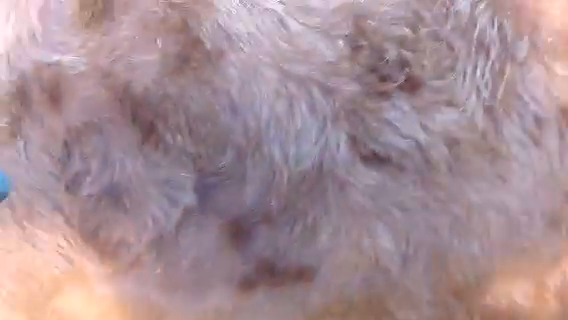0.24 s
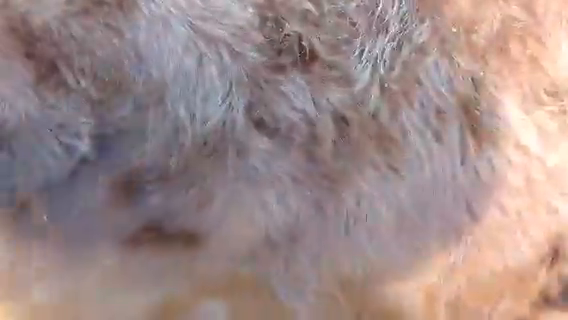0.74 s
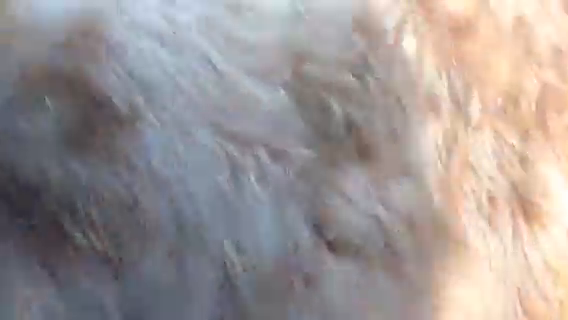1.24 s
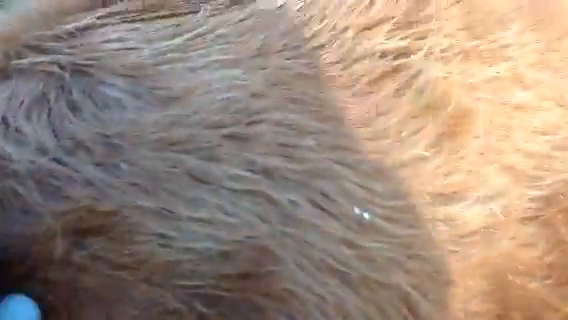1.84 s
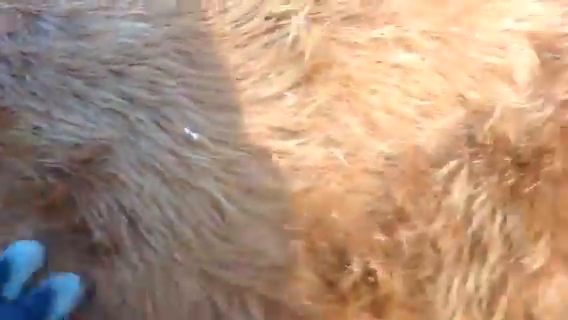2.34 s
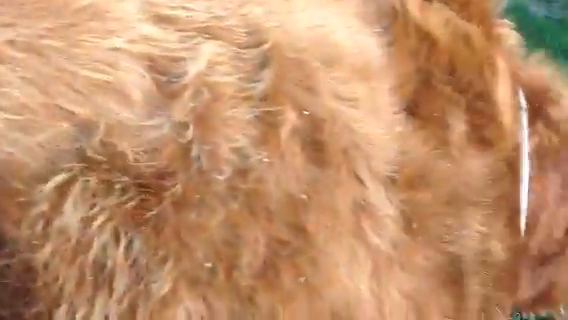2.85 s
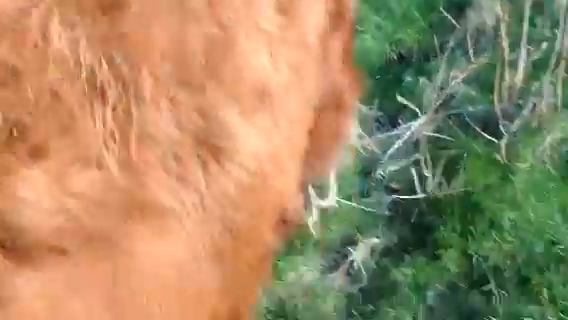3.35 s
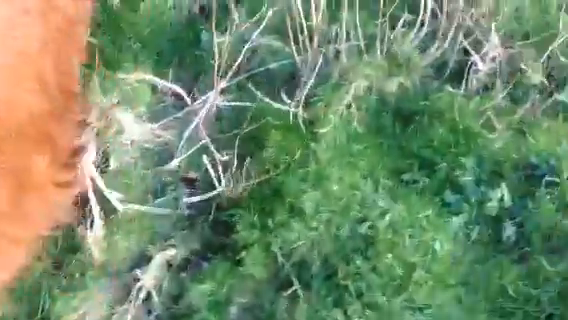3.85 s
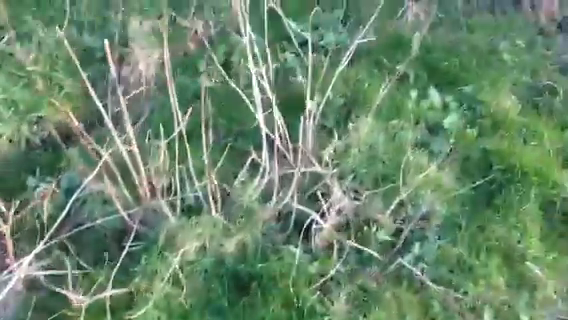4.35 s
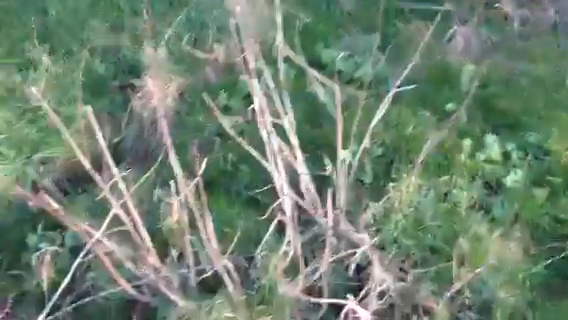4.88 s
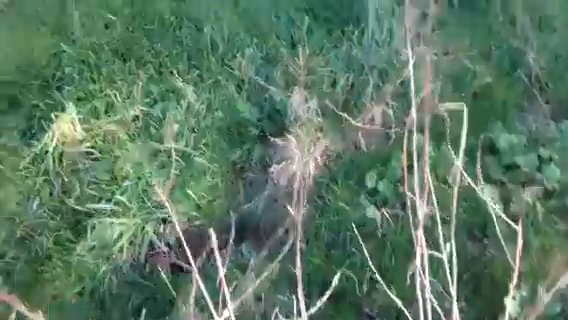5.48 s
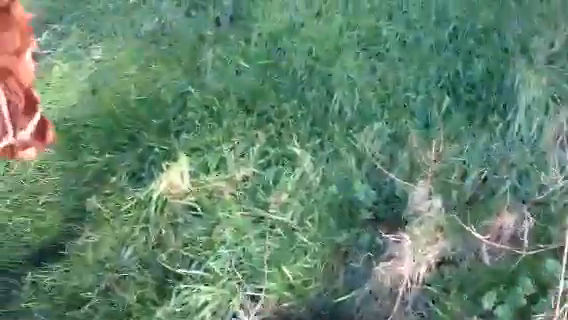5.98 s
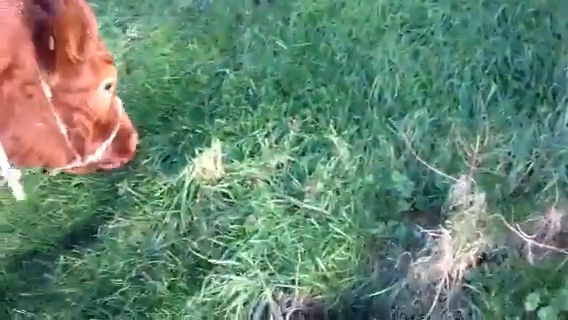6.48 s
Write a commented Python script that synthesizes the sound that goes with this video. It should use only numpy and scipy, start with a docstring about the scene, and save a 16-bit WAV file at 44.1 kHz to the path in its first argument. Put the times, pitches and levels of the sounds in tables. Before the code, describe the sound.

Close, dry outdoor sound of a cow grazing. Grass rustles softly over a faint low rumble while a gloved hand lightly rubs the coat. Two sharp snaps break tufts about a second apart. Brighter swishes and crisp ticks thicken, then a mouthful tears off in one loud, dense rip with a low thump. Weaker rustles and dull little thuds follow and thin out. Small microphone, no echo.

```python
"""A field: a cow grazes close by. Blades swish and tick as she moves through the grass. Two sharp knocks sound
near 0.75 s and 1.77 s (damped swings and bursts of noise); a mouthful comes away in one loud rip of dense,
merging fractures. A gloved hand rubs her coat (swelling resonant noise) and a few dull thuds sound (low
swings). Filtered noise makes the low rumble of open country."""
import sys
import numpy as np
from scipy import signal
from scipy.fft import rfft, irfft, next_fast_len
from scipy.io import wavfile
from scipy.ndimage import uniform_filter1d

SR = 44100
rng = np.random.default_rng(int(sys.argv[2]) if len(sys.argv) > 2 else 0)


def generate_wav(signal):
    """Clip the signal to [-1, 1] and save it as 16-bit WAV at the path in sys.argv[1]."""
    frames = np.transpose(np.atleast_2d(signal))
    scaled = np.clip(frames, -1, 1) * 32767
    pcm = np.round(scaled).astype(np.int16)
    wavfile.write(sys.argv[1], SR, pcm)


N = 296352
TIME = np.arange(N) / SR

# sharp knocks, each a few quick hits: (time [s], body level [dB], body pitch [Hz], body t60 [s], crack level
# relative to body, before the common trim [dB], crack t60 [s])
KNOCKS = [(.7400, -32, 400, 0.024, -4, 0.026), (.7500, -17.5, 400, 0.008, -10, 0.0052),
          (.7540, -10.5, 463, 0.0097, -14.5, .014), (.7555, -21.5, 824, 0.044, -7.5, 0.013),
          (0.7605, -24.5, 318, 0.044, -5, 0.025), (1.7646, -11.5, 1140, 0.004, -7, .011),
          (1.77, -21.5, 230, 0.025, 4.5, 0.016), (1.7721, -15.5, 1390, .0066, -1.5, 0.014),
          (1.7738, -6, 2130, 0.0009, -2.5, 0.0023)]


def undb(db):
    """Decibels to gain."""
    return 10 ** (np.asarray(db) / 20)


def unit(x):
    """Scale to rms 1."""
    return x / np.sqrt(np.mean(x ** 2))


def add(track, s, sound):
    """Mix a sound into a track at time s."""
    i = int(s * SR)
    track[i:i + len(sound)] += sound[:N - i]


def colour(x, points):
    """Minimum-phase filter through (frequency [Hz], level [dB]) points; keeps the power of white noise."""
    size = next_fast_len(len(x) + 4096, True) * 2
    hz, db = np.transpose(points)
    bins_hz = np.fft.rfftfreq(size, 1 / SR)
    gain = unit(undb(np.interp(np.log(bins_hz + 1), np.log(hz), db)))
    # folding the cepstrum makes the response causal
    cepstrum = irfft(np.log(gain))
    cepstrum[1:size // 2] *= 2
    cepstrum[size // 2 + 1:] = 0
    response = np.exp(rfft(cepstrum))
    return irfft(rfft(x, size) * response)[:len(x)]


def resonate(x, hz, width_hz):
    """One band-pass resonance."""
    q = hz / min(width_hz, SR / 3)
    b, a = signal.iirpeak(min(hz, SR / 2 - 1), q, fs=SR)
    return signal.lfilter(b, a, x)


def fade(t60_s):
    """Exponential decay, cut off after a fifth of a second."""
    return np.exp(-np.log(1000) * TIME[:SR // 5] / t60_s)


def recoil(hz, t60_s):
    """Damped swing of something suddenly let go."""
    decay = fade(t60_s)
    return -np.sin(2 * np.pi * hz * TIME[:len(decay)]) * decay


def walk(rate_hz):
    """Smooth random wander with a spread near 1."""
    k = max(int(SR / rate_hz), 2)
    steps = np.repeat(rng.standard_normal(N // k + 1), k)
    return unit(uniform_filter1d(steps, k)[:N])


def grains(rate_per_s, spread_db, t60_s):
    """Tiny fractures at random moments, of very unequal size, each a brief noise burst; rms 1."""
    hits = rng.random(N) < rate_per_s / SR
    sizes = undb(spread_db * np.minimum(rng.exponential(size=N), 5))
    pole = np.exp(-2 * np.log(1000) / (t60_s * SR))
    power = signal.lfilter([1], [1, -pole], hits * sizes ** 2)
    return unit(np.sqrt(power) * rng.standard_normal(N))


def field():
    """Low, gently wavering rumble from far away, slowly growing."""
    # (frequency [Hz], level [dB])
    field_colour = [(25, -33), (45, -15), (70, -17.5), (100, -7), (140, -0.5), (220, 0.5), (300, -2),
                    (450, -5.5), (700, -9), (1100, -15), (2000, -19), (4500, -28), (15000, -29.5)]
    rumble_db, growth_db_per_s = -55, 0.46
    level_db = rumble_db + growth_db_per_s * TIME + 0.5 * walk(8)
    return colour(rng.standard_normal(N), field_colour) * undb(level_db)


def brushing():
    """Gains of swish and crunch: a steady stir, and a smooth swell for each tuft brushed aside."""
    # grass stirring all the while, most as the cow steps forward:
    # (time [s], level of fine blades [dB], level of coarse stems [dB])
    stir = [(0, -60.5, -76), (.4, -56, -65.5), (1.5, -55.5, -64.5), (2.05, -60, -65.5), (2.4, -57.5, -64.5),
            (3.1, -58.5, -69.5), (3.45, -45, -54), (3.75, -48, -60.5), (4.24, -46, -57.5),
            (4.38, -58, -62.5), (4.9, -55, -57.5), (5.3, -61, -72), (5.8, -57, -60.5), (6.25, -66, -69),
            (6.72, -74, -71)]
    # tufts brushed aside: (middle [s], width at half gain [s], swish level [dB], crunch level [dB])
    sweeps = [(0.522, 0.11, -50.5, -58.5), (0.789, 0.073, -61, -52.5), (1.25, 0.17, -52.5, -61.5),
              (1.455, 0.15, -48.5, -59.5), (1.562, 0.03, -40, -59), (1.76, 0.19, -51.5, -61),
              (1.923, 0.12, -52, -70), (2.125, 0.085, -53.5, -63), (2.246, 0.11, -48, -69),
              (2.596, .07, -48.5, -59.5), (2.755, 0.069, -43.5, -55.5), (2.847, 0.25, -51, -65),
              (3.066, .06, -49.5, -60), (3.243, 0.089, -52, -63), (3.92, 0.19, -44.5, -61),
              (4.157, 0.13, -42, -74), (4.52, 0.092, -37.5, -57), (4.686, 0.11, -46.5, -48),
              (5.11, 0.16, -58, -53), (5.41, 0.057, -56, -72), (5.923, 0.075, -45.5, -54.5),
              (6.02, 0.15, -54, -67), (6.34, .06, -56.5, -71)]
    rise_share = 0.49  # of the width
    s, *levels = np.transpose(stir)
    power = undb([np.interp(TIME, s, db) for db in levels]) ** 2
    for middle_s, width_s, swish_db, crunch_db in sweeps:
        side_s = width_s * np.where(TIME < middle_s, rise_share, 1 - rise_share)
        swell = .5 ** (((TIME - middle_s) / side_s) ** 2)
        power = power + np.outer(undb([swish_db, crunch_db]), swell) ** 2
    return np.sqrt(power)


def flecks(rate_per_s=70, low_hz=600, high_hz=4200, cycles=9, spread_db=3.5):
    """Stems of every thickness flick now and then, each ringing briefly at its own pitch; rms 1."""
    out = np.zeros(N)
    for when, thickness, draw in rng.random((int(rate_per_s * N / SR), 3)):
        hz = high_hz * (low_hz / high_hz) ** thickness
        gain = undb(-spread_db * np.log(max(draw, .02)))
        add(out, when * TIME[-1], gain * recoil(hz, cycles / hz))
    return unit(out)


def rustle(swish_gain, crunch_gain, flecks_db=-5):
    """Fine blades slide past each other with a bright swish; thicker stems crunch and flick lower down."""
    # (frequency [Hz], level [dB])
    swish_colour = [(300, -16), (1000, -17), (2500, -9.5), (4200, -7.5), (5500, -3.5), (8000, -2.5),
                    (11000, -0.5), (15000, -0.5)]
    # (frequency [Hz], level [dB])
    crunch_colour = [(60, -12), (160, -9), (400, -1), (900, 0), (1500, -0.5), (2400, -2.5), (3600, -3),
                     (5000, -8), (7000, -19), (15000, -45)]
    swish = colour(grains(rate_per_s=5700, spread_db=2.5, t60_s=0.005), swish_colour)
    crunch = colour(grains(rate_per_s=1800, spread_db=2.0, t60_s=0.0092), crunch_colour)
    crunch = crunch + undb(flecks_db) * flecks()
    swish_flutter = undb(0.9 + 1.0 * walk(60))
    crunch_flutter = undb(1.8 * walk(50))
    return swish * swish_gain * swish_flutter + crunch * crunch_gain * crunch_flutter


def rubs():
    """Short strokes of friction swell and fade in one broad resonance."""
    # glove on coat and muzzle on grass: (middle [s], level [dB], length [s], resonance [Hz],
    # width before widening [Hz])
    strokes = [(0.138, -50, 0.041, 716, 600), (1.287, -53.5, 0.42, 355, 159), (1.499, -53, .16, 438, 200),
               (1.44, -49.5, 0.024, 2370, 800), (1.73, -44.5, 0.027, 666, 450),
               (2.748, -46, 0.026, 1500, 1500), (3.236, -52.5, 0.034, 1070, 700),
               (3.363, -50.5, 0.057, 796, 1100), (4.733, -48, 0.098, 970, 800),
               (5.93, -49.5, 0.063, 3350, 1500)]
    widening = 1.06  # for two resonances in a row
    out = np.zeros(N)
    for s, db, length_s, hz, width_hz in strokes:
        once = resonate(rng.standard_normal(SR), hz, width_hz * widening)
        friction = unit(resonate(once, hz, width_hz * widening))
        stroke = np.hanning(int(length_s * SR))
        add(out, s - length_s / 2, undb(db) * stroke * friction[-len(stroke):])
    return out


def faint_ticks(swish_gain):
    """Stray blades flick at random, louder with the swish: (time [s], peak before gain [dB], centre [Hz])."""
    rate_per_s, over_swish_db, range_db = 11, 19, 5.5
    low_hz, high_hz = 6960, 13400
    when, weakness, pitch = rng.random((int(rate_per_s * N / SR), 3)).T
    at = (when * N).astype(int)
    db = 20 * np.log10(swish_gain[at]) + over_swish_db - range_db * weakness
    return list(zip(TIME[at], db, low_hz * (high_hz / low_hz) ** pitch))


def ticks(swish_gain, t60_s=0.0016, tail_db=-21, tail_t60_s=0.023, relative_width=0.83,
          stalk_hz=1800, stalk_width_hz=1300, stalk_db=-9, gain_db=1):
    """Each tick is a millisecond of fracture and a faint shiver; the stalk below adds a woody note."""
    # loudest blades and dry stalks: (time [s], peak before gain_db [dB], centre [Hz])
    loud_ticks = [(.2055, -32, 12000), (.2209, -31, 10000), (.5032, -26.5, 7450), (.6059, -32.5, 7800),
                  (.6890, -34, 3540), (1.5574, -24, 11000), (1.7359, -28, 5640), (1.884, -29.5, 6500),
                  (2.7622, -24.5, 6000), (3.0602, -32, 10100), (3.0914, -20, 7500), (3.099, -15, 11500),
                  (3.1952, -26.5, 9300), (3.2141, -24, 12300), (3.2651, -26.5, 11600), (3.6685, -20, 7400),
                  (3.7308, -29.5, 11400), (3.7888, -25.5, 7000), (3.8813, -19.5, 11000),
                  (3.9108, -15.5, 8000), (3.9179, -22, 12500), (4.0629, -24, 9000), (4.1556, -28, 8000),
                  (4.178, -27, 7900), (4.4995, -22, 2000), (4.5465, -26.5, 2960), (4.9324, -32.5, 6450),
                  (5.165, -32.5, 2500), (5.318, -28, 2740), (5.904, -28, 9100)]
    out = np.zeros(N)
    shape = fade(t60_s) + undb(tail_db) * fade(tail_t60_s)
    for s, db, hz in loud_ticks + faint_ticks(swish_gain):
        fracture = rng.standard_normal(len(shape)) * shape
        blade = resonate(fracture, hz, relative_width * hz)
        stalk = resonate(fracture, stalk_hz, stalk_width_hz)
        tick = blade + undb(stalk_db) * stalk
        # thick stalks break more slowly and lack the top
        b, a = signal.butter(2, min(2 * hz, SR / 2 - 1000), fs=SR)
        tick = signal.lfilter(b, a, tick)
        add(out, s, tick * undb(db + gain_db) / np.abs(tick).max())
    return out


def followers(count=3):
    """Each hit is followed by a few weaker ones at scattered pitches within 16 ms, the later the weaker."""
    within_s, start_db, fall_db_per_s = .016, -15, -500
    low_hz, high_hz, t60_s, crack_db = 700, 1600, 0.0097, -5
    rows = []  # columns as in KNOCKS
    for s, db, *_ in KNOCKS:
        for when, pitch in rng.random((count, 2)):
            lag_s = when * within_s
            hz = low_hz * (high_hz / low_hz) ** pitch
            weaker_db = db + start_db + fall_db_per_s * lag_s
            rows.append((s + lag_s, weaker_db, hz, t60_s, crack_db, t60_s))
    return rows


def snaps(crack_trim_db=-1, shiver_db=-31, shiver_t60_s=0.15, lowest_hz=135):
    """Each hit rings briefly and cracks with noise; a faint crackle shivers on after it."""
    # (frequency [Hz], level [dB])
    crack_colour = [(100, -4), (300, 5.5), (1300, 10), (2800, 5), (5000, 1), (8000, -1), (13000, 0)]
    body, crack_power, shiver_power = np.zeros((3, N))
    for s, db, hz, t60_s, crack_db, crack_t60_s in KNOCKS + followers():
        add(body, s, undb(db) * recoil(hz, t60_s))
        add(crack_power, s, (undb(db + crack_db + crack_trim_db) * fade(crack_t60_s)) ** 2)
        add(shiver_power, s, (undb(db + shiver_db) * fade(shiver_t60_s)) ** 2)
    cracks = np.sqrt(crack_power) * rng.standard_normal(N)
    shiver = np.sqrt(shiver_power) * grains(rate_per_s=900, spread_db=0.5, t60_s=0.0031)
    # the knocks carry little deep bass
    highpass = signal.butter(2, lowest_hz, "highpass", fs=SR, output="sos")
    return signal.sosfilt(highpass, body + colour(cracks + shiver, crack_colour))


def thuds():
    """A soft contact builds up over one cycle's time and gives a brief, low, damped swing."""
    # low thuds, the loudest as the rip begins: (time [s], peak [dB], pitch [Hz], t60 [s])
    low_thuds = [(4.4056, -13.5, 335, 0.0092), (4.4090, -25, 243, 0.053), (4.6120, -38.5, 324, 0.023),
                 (3.1450, -48, 130, 0.044), (5.256, -33.5, 202, .022), (5.3444, -33.5, 185, 0.017),
                 (5.5940, -40, 140, 0.03), (5.6188, -35.5, 206, 0.017), (5.6430, -42, 190, 0.029)]
    out = np.zeros(N)
    for s, db, hz, t60_s in low_thuds:
        swing = recoil(hz, t60_s)
        swing = swing * np.minimum(TIME[:len(swing)] * hz, 1)
        add(out, s, undb(db) * swing / np.abs(swing).max())
    return out


def rip(bulk_db=-21.5, bulk_hz=600, bulk_width_hz=1000, bulk_t60_s=0.13, trail_hz=2200, trail_width_hz=2600):
    """A low burst opens the rip, the pull builds, and fibres part so fast that they merge."""
    # (frequency [Hz], level [dB])
    fibre_colour = [(60, -33), (200, -3.5), (750, -7.5), (1500, 0), (2400, -1), (4000, -4.5), (7000, -6.5),
                    (10000, -9), (15000, -13)]
    start_s, attack_s, hold_s, release_t60_s = 4.4044, .005, 0.055, .1
    pull_db, build_db_per_s = -16, 75
    trail_db, trail_t60_s = -16.5, 0.25  # level relative to the pull
    since = TIME - start_s
    before = np.maximum(hold_s - since, 0)
    after = np.maximum(since - hold_s, 0)
    pull = np.clip(since / attack_s, 0, 1) * undb(pull_db - build_db_per_s * before)
    release = np.exp(-np.log(1000) * after / release_t60_s)
    trail = np.exp(-np.log(1000) * after / trail_t60_s)
    tearing = pull * release * grains(rate_per_s=9700, spread_db=2.5, t60_s=0.0035)
    last_fibres = grains(rate_per_s=2500, spread_db=3.0, t60_s=.003)
    last_fibres = unit(resonate(last_fibres, trail_hz, trail_width_hz))
    out = colour(tearing, fibre_colour) + undb(trail_db) * pull * trail * last_fibres
    shape = fade(bulk_t60_s)
    bulk = resonate(rng.standard_normal(len(shape)), bulk_hz, bulk_width_hz)
    bulk = resonate(bulk, bulk_hz, bulk_width_hz)
    add(out, start_s, undb(bulk_db) * unit(bulk) * shape)
    return out


def scene():
    """Everything in the open air, without echo."""
    swish_gain, crunch_gain = brushing()
    grass = rustle(swish_gain, crunch_gain) + ticks(swish_gain)
    return (field() + grass + rubs() + snaps() + thuds() + rip())[None]


def record(dry, bass_hz=75, top_hz=15300):
    """A small microphone that thins the deep bass and cuts the top."""
    highpass = signal.butter(2, bass_hz, "highpass", fs=SR, output="sos")
    lowpass = signal.ellip(10, .1, 70, top_hz, fs=SR, output="sos")
    return signal.sosfilt(lowpass, signal.sosfilt(highpass, dry))


dry = scene()
out = record(dry)
generate_wav(out)
```